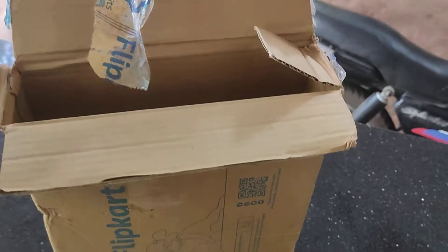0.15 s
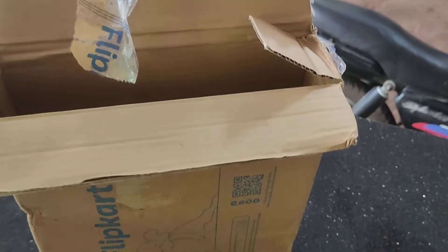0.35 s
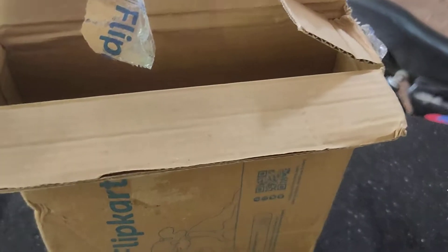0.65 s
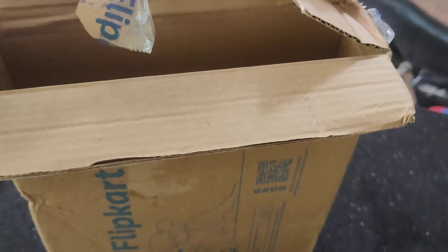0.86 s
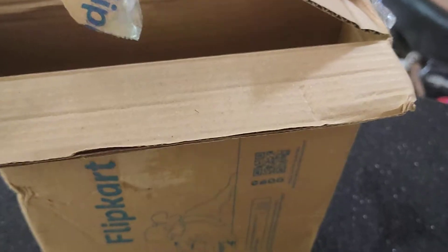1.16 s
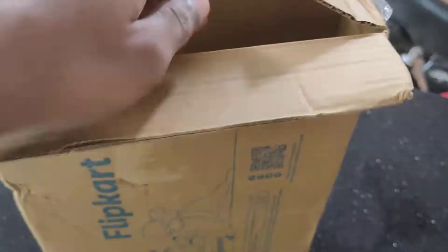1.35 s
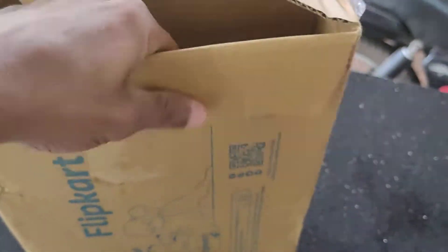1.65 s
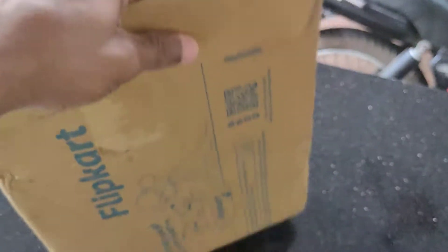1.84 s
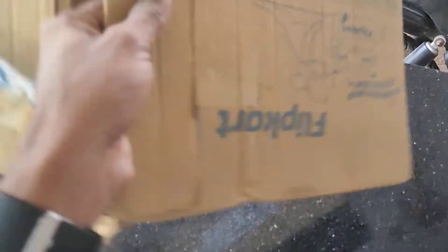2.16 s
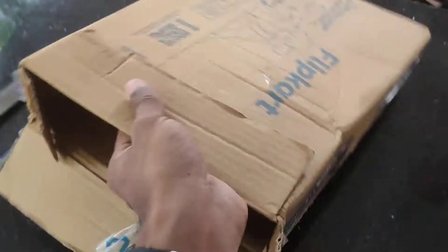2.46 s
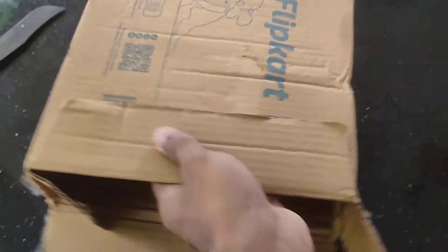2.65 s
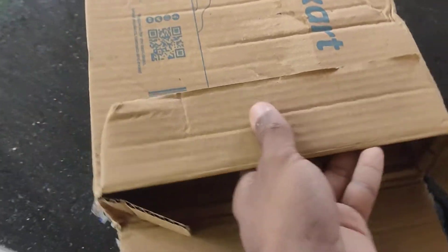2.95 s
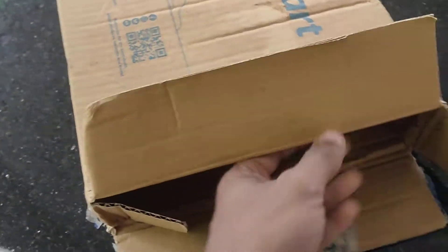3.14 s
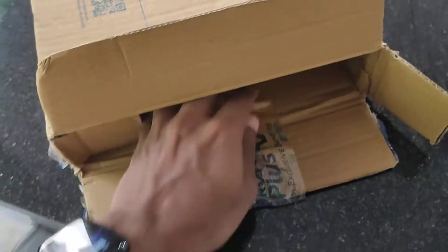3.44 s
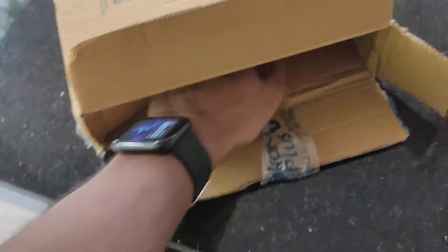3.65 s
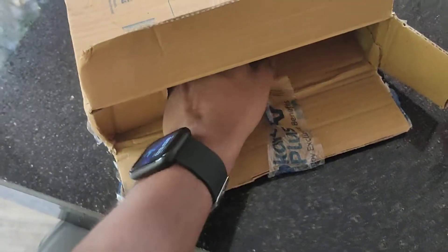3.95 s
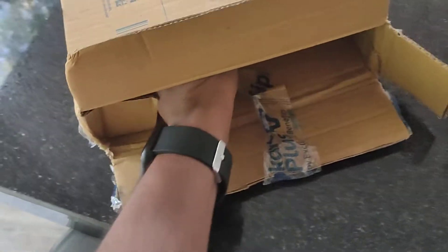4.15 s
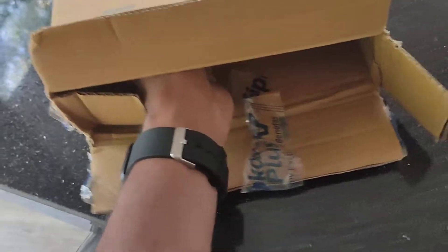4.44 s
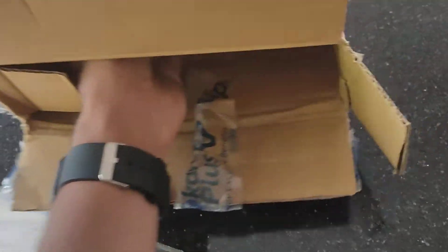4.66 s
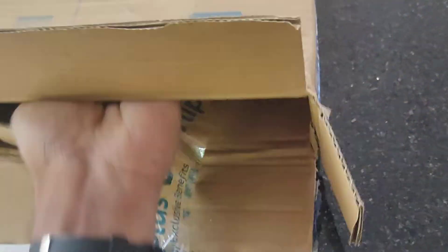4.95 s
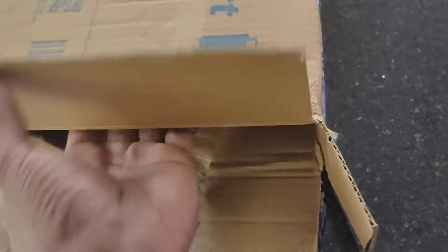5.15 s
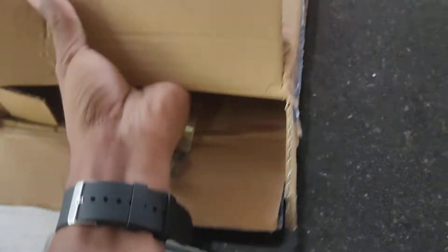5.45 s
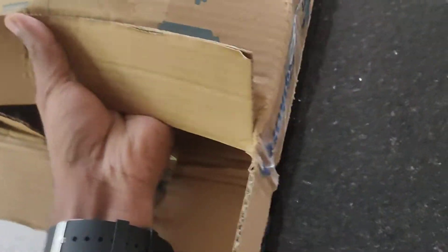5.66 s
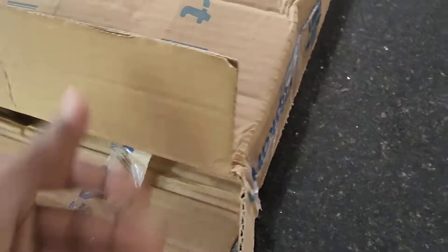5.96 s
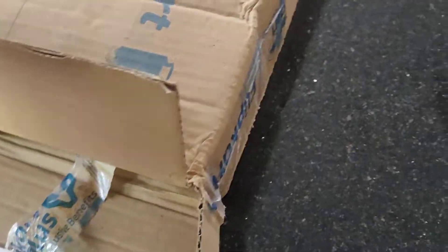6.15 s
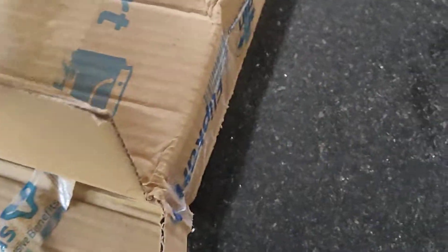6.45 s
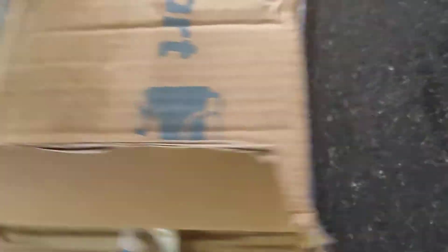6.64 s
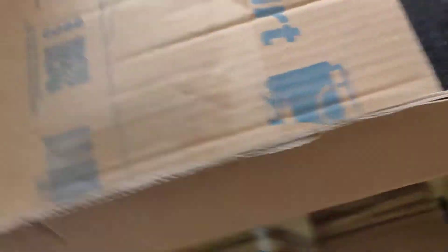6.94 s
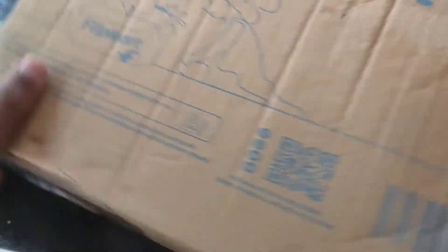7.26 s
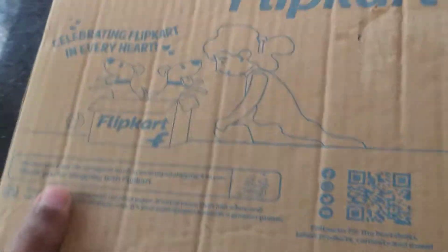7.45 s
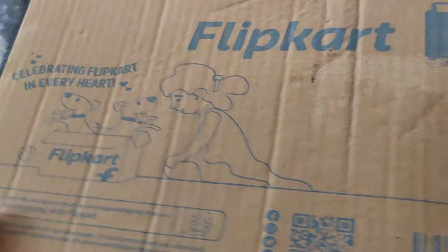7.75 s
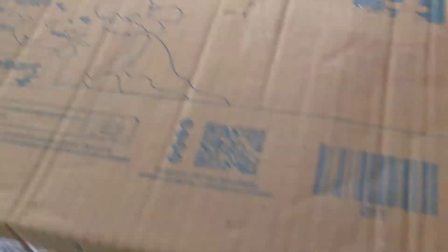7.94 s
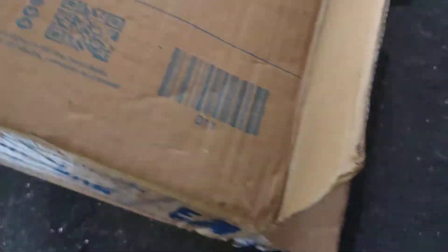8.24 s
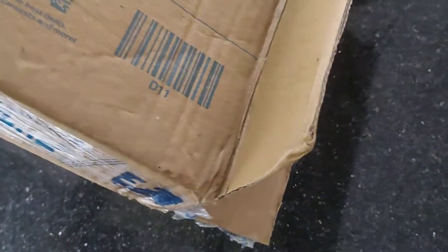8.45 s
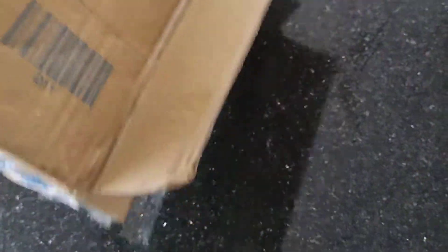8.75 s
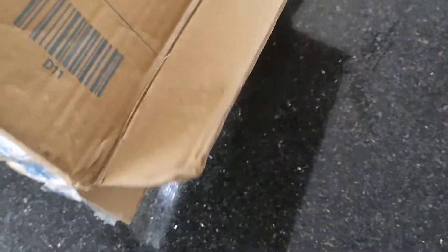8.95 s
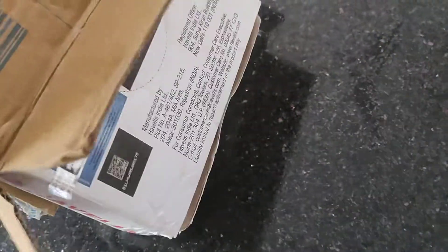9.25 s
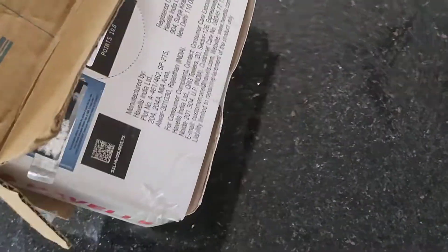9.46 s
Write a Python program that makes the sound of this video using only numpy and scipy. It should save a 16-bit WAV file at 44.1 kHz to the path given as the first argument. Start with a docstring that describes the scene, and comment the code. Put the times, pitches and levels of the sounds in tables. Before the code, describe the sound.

A quiet, small hard room with soft air noise and low handling rumble; the microphone is close. Faint cardboard brushing and a tiny far whistle come at 0.3 s. At 0.83-0.95 a knife clatters on stone in quick bright ticks with a short ring. From 1.4 hands grab the box with light rustles and creases; at 2.45-2.9 it is turned with two hollow thumps and sharp cracks. From 3.2 to 5.6 hands search inside: hissy rubs, tape crinkles, small snaps and dull knocks. At 5.85 the box lands on a corner, the loudest knock and crunch. A lull follows, with a very faint distant crow. From 6.5 to 8.5 it slides and turns, with a bright snap at 7.84. A clearer but distant rooster crows from 7.7 to 9.6. Near 8.9-9.25 a knock, strong scraping pull and loud snap finish, then small rustles.

```python
"""Cardboard rubs and slides: an open box is turned, searched and emptied on a stone counter.
Clicks and hiss passed through filters make the rubbing; short noise bursts make the snaps and knocks.
A knife put down with a clink is filtered noise plus the fading tones of its blade.
Far outside, sums of gliding tones crow like a rooster, and thin high tones whistle.
A small hard room answers with fading noise echoes, over a steady hum of air and a deep rumble."""
import sys
import numpy as np
from scipy import signal
from scipy.fft import rfft, irfft
from scipy.io import wavfile
from scipy.ndimage import uniform_filter1d

SR = 44100
rng = np.random.default_rng(int(sys.argv[2]) if len(sys.argv) > 2 else 0)


def to_wav(s):
    """Save 16-bit WAV."""
    ch = np.atleast_2d(s).T  # columns
    pcm = np.round(np.clip(ch, -1, 1) * 32767)  # PCM
    wavfile.write(sys.argv[1], SR, pcm.astype(np.int16))


N = 423360  # length in samples
TIME, HZ = np.arange(N) / SR, np.fft.rfftfreq(N, 1 / SR)

# Levels in the tables are starting points; the functions trim some of them.
# Loudest creases and tape snaps: (time [s], level [dB])
SNAP_EVENTS = [(1.484, -45), (1.6214, -45), (1.8402, -38.5), (2.2822, -47.5), (2.3136, -42.5), (2.467, -37),
               (2.499, -30), (2.5056, -34.5), (2.6503, -38.5), (2.6947, -38), (2.7292, -28), (2.832, -39),
               (2.877, -36), (3.272, -32.5), (3.294, -34.5), (3.3042, -29), (3.361, -27.5), (3.5193, -35),
               (3.5878, -31), (3.637, -41), (3.682, -34), (3.8063, -34), (3.8623, -39.5), (3.9541, -41.5),
               (4.041, -36), (4.1624, -43), (4.98, -28), (5.1669, -37.5), (5.3992, -30.5), (5.5429, -37),
               (5.6307, -41.5), (5.808, -41), (5.8542, -17), (6.912, -47), (7.511, -34), (7.8404, -24.5),
               (8.0591, -31.5), (8.0676, -37), (8.3961, -37), (8.8928, -34), (9.1705, -28), (9.1841, -19),
               (9.3258, -35.5), (9.5114, -37.5)]
# Blows on the box walls: (time [s], level [dB], deep tone [dB], hard tone [dB])
KNOCK_EVENTS = [(0.292, -42.5, 0, -14), (1.382, -52, -10, -7), (1.734, -42.5, -25, -19),
                (2.277, -48, -25, -19), (2.467, -25, -6.5, -15.5), (2.497, -22.5, -8, -14.5),
                (2.649, -36.5, -14, -19.5), (2.777, -39, -14.5, -10.5), (2.874, -41.5, -14, -4),
                (3.563, -40, -11, -12), (3.679, -39.5, -1, -3.5), (4.159, -40, -21, -21.5),
                (5.12, -38, -8.5, -14.5), (5.339, -38.5, 9.5, 1.5), (5.395, -36.5, -12, -7),
                (5.608, -39, -9, -21), (5.833, -34, -10, -17), (5.853, -16, -13.5, -12),
                (6.459, -42, -11.5, -20), (6.657, -36, -27.5, -35), (6.719, -38, -26, -28),
                (7.504, -40.5, -36, -18), (7.836, -38, -3, -42), (8.886, -26.5, -48, -32.5),
                (9.187, -27, -31, -20.5), (9.249, -31.5, -15, -7), (9.487, -42, 0, -3.5)]
# Bounces of the knife on stone: (time [s], level [dB])
KNIFE_BOUNCES = [(0.8341, -23), (0.8479, -17.5), (.857, -18.5), (0.859, -23.5), (.872, -30), (0.932, -26.5),
                 (.953, -24.5)]
# Ringing tones of the blade: (frequency [Hz], level [dB], time to fall 60 dB [s])
BLADE_TONES = [(2566, -3.5, 0.087), (3360, -8, 0.073), (4710, 0, .12), (5960, 2, 0.22), (6650, -5, 0.09),
               (7350, 10, .14)]
# Ringing tones of the box panels and the air inside: (frequency [Hz], level [dB], time to fall 60 dB [s])
BOX_TONES = [(183, -10.5, 0.11), (237, -8.5, 0.063), (295.7, -1.5, 0.1), (354.5, -0.5, 0.11),
             (482, -6, 0.17), (597, -3.5, 0.054), (730, 9.5, 0.03), (820, 1.5, 0.045), (1145, -2, 0.043),
             (1765, -2.5, 0.041)]
# Far crowing, one curve for each call: (time [s], pitch [Hz], level [dB])
CROW_CALLS = [
    [(5.5, 603, -86), (5.68, 618, -77), (5.76, 655, -74), (6.0, 672, -79), (6.2, 674, -95)],
    [(7.66, 750, -80), (7.84, 741, -78), (7.95, 726, -68), (8.02, 708, -72.5), (8.17, 776, -70.5),
     (8.3, 814, -67.5), (8.42, 832, -74), (8.56, 778, -69.5)],
    [(8.64, 778, -67.5), (9.05, 773, -65), (9.4, 758, -72), (9.6, 733, -79)],
]
# How strongly the crow's throat passes each pitch: (frequency [Hz], level [dB])
THROAT = [(600, -20), (720, 1.5), (775, -6), (820, 0.5), (1250, -3), (1440, -7.5), (1560, -6.5), (1650, -6),
          (2150, -9), (2450, -20)]
# Thin whistles: (time [s], length [s], start pitch [Hz], end pitch [Hz], level [dB])
WHISTLE_EVENTS = [(.26, .16, 7850, 7200, -59), (1.16, .2, 7700, 7300, -71), (6.28, .17, 7850, 7600, -68),
                  (8.22, .2, 7600, 7400, -66), (6.21, .16, 3640, 3610, -80)]
# Single scuffs, each in one broad resonance: (time [s], length [s], frequency [Hz], width [Hz], level [dB])
SCUFF_EVENTS = [(0.274, 0.069, 168, 50, -59.5), (0.223, 0.13, 6300, 1570, -62),
                (2.933, 0.39, 2300, 700, -67.5), (4.135, 0.31, 1200, 700, -64), (4.15, .1, 262, 60, -56),
                (5.301, 0.073, 350, 400, -56.5), (4.422, 0.73, 217, 50, -64),
                (5.845, 0.023, 1070, 191, -36), (6.535, 0.34, 400, 250, -56.5),
                (6.547, 0.33, 846, 345, -57.5), (9.06, 0.21, 173, 91, -50)]
# Strokes of cardboard over cardboard, skin and stone:
# (time [s], length [s], fastest point [0-1], hiss level [dB], panel drumming level [dB])
STROKE_EVENTS = [(0.0, 0.67, 0.55, -69.5, -75.5), (1.098, 0.29, 0.42, -68, -72),
                 (1.376, 0.042, 0.34, -52, -55), (1.447, 0.13, 0.12, -51, -58.5),
                 (1.61, 0.34, 0, -60.5, -68.5), (2.13, 0.031, 0.6, -60, -69),
                 (2.424, 0.17, .45, -52, -53.5), (2.632, 0.28, 0.32, -48.5, -60.5),
                 (2.914, .28, 0.71, -52.5, -72.5), (3.24, 0.15, 0.56, -43.5, -61.5),
                 (3.503, 0.35, 0.37, -50, -57), (3.935, 0.52, 0, -54.5, -64),
                 (4.149, .46, 0.49, -51, -57.5), (4.671, 0.16, 0.1, -53.5, -61.5),
                 (4.904, 0.27, 0.38, -47.5, -58), (5.202, 0.33, 0.6, -54, -59.5),
                 (5.607, 0.083, 0, -57, -68), (5.75, 0.28, 0.99, -48.5, -62), (6.47, 0.093, .8, -59.5, -64),
                 (6.556, 0.26, 0.24, -50.5, -62), (6.938, 0.51, .4, -50, -62.5),
                 (7.291, 0.39, 0.75, -50, -60.5), (7.714, 0.064, 0.2, -48.5, -59.5),
                 (7.83, 0.38, 0.36, -56.5, -62.5), (8.21, 0.28, .5, -60, -63.5),
                 (8.725, 0.29, 0.67, -47.5, -57.5), (8.99, .3, 0.49, -36, -45.5),
                 (9.312, 0.12, 0, -56.5, -60.5)]
# Handling sound that stays once the box is held: (time [s], hiss level [dB], panel drumming level [dB])
HOLDING = (1.38, -67.5, -71)
# Deep handling rumble over time: (time [s], level [dB])
RUMBLE_CURVE = [(0, -76.5), (1.1, -68.5), (2.6, -66.5), (3.1, -76), (3.7, -66), (4.7, -70), (5.7, -67),
                (6.3, -69.5), (8.4, -75.5), (9.2, -63), (9.6, -68)]
# Tone colours of hiss, drumming, snaps, thuds, steel and room air: (frequency [Hz], level [dB])
HISS_COLOUR = [(600, -53), (1600, -22.5), (2400, -5.5), (3100, -6.5), (4000, 0), (5200, 3.5), (6300, 8.5),
               (7600, 3.5), (9000, -52)]
DRUM_COLOUR = [(30, -2), (65, -2), (110, -2), (230, 3), (340, -2), (540, -5), (760, -3.5), (1100, -6.5),
               (1500, -9.5), (2200, -11), (4500, -39.5)]
SNAP_COLOUR = [(100, -28.5), (600, -22), (1500, -12.5), (2600, -14.5), (4000, -4), (5800, 8), (7200, 4),
               (8500, -15.5)]
THUD_COLOUR = [(30, 1), (100, -8.5), (220, 1), (330, 4.5), (520, -2), (750, -6), (1100, -3), (1500, -14),
               (1800, -10.5), (3000, -12), (8000, -19.5)]
STEEL_COLOUR = [(200, -32), (900, -24), (1900, -23.5), (2600, -13), (3600, -15.5), (5000, -8.5),
                (6800, 4.5), (8500, -14.5)]
AIR_COLOUR = [(20, 3.5), (35, -4.5), (60, -13), (130, -9), (300, -17), (1000, -27), (2500, -25),
              (4500, -29.5), (7000, -24), (9000, -32.5)]
# Tone colour of the rumble: (frequency [Hz], level [dB])
RUMBLE_COLOUR = [(15, -8.0), (28, -2), (55, -10.5), (90, -8.0), (200, -36.0), (1000, -80.0)]
# Left level against right level for the box: (frequency [Hz], difference [dB])
LEFT_OVER_RIGHT = [(100, 0), (800, 0.9), (1800, 1.8), (2700, 3.34), (3900, 7.98), (5600, 12), (6800, 7),
                   (7700, -3)]
# How alike the box sounds left and right: (frequency [Hz], likeness [0-1])
LIKENESS = [(100, 0.92), (300, 0.99), (700, 0.83), (2000, 0.18), (7000, 0.12)]
# How much of the room air is shared by left and right: (frequency [Hz], share of power [0-1])
AIR_SHARE = [(150, 0.88), (600, 0.65), (2000, .1)]
# How long the room's echoes last: (frequency [Hz], time to fall 60 dB [s])
ROOM_FADE = [(150, 0.31), (500, 0.43), (1500, 0.36), (4000, 0.47), (7000, 0.36)]

AIR_DB = -68.5
EDGE_HZ = 7980  # upper limit of the finished sound
# Each stroke starts and ends quieter than its fastest point, and catches and lets go quickly
START_DB, END_DB, GRAB_S, LET_GO_S = -8, -7, 0.0087, 0.017
# Loose tape: crinkles per second before clumping, strength of clumping, level against the fibres
CRINKLES_PER_S, CLUMP_DB, CRINKLE_DB = 45, 6, -6


def amp(db):
    """Turns decibels into a gain."""
    return 10 ** (np.asarray(db) / 20)


def unit(x):
    """Scales a sound to an average (rms) strength of 1."""
    return x / np.sqrt(np.mean(x ** 2) + 1e-20)


def strength(x, size=88):
    """Finds the rms of the loudest two milliseconds."""
    return np.sqrt(uniform_filter1d(x ** 2, size).max())


def read(points, hz):
    """Reads between the points of a table, with frequency on a log scale."""
    f, value = np.transpose(points)
    return np.interp(np.log(hz + 1), np.log(f + 1), value)


def add(mix, s, sound):
    """Mixes a sound in at time s."""
    part = mix[..., max(round(s * SR), 0):][..., :sound.shape[-1]]
    part += sound[..., :part.shape[-1]]


def colour(x, points, size=4096):
    """Filters a sound to a tone colour, with nothing heard before its cause."""
    log_gain = np.log(amp(read(points, abs(np.fft.fftfreq(size, 1 / SR)))))
    minimum_phase = np.exp(np.conj(signal.hilbert(log_gain)))
    taps = np.fft.ifft(minimum_phase).real[:size // 2]
    return signal.oaconvolve(x, taps)[:len(x)]


def wander(cutoff_hz):
    """Makes a random curve of rms 1, with little change faster than the cutoff."""
    noise = rfft(rng.standard_normal(N))
    return unit(irfft(noise / (1 + (HZ / cutoff_hz) ** 4), N))


def grains(per_s, spread_db, smooth):
    """Fibres catch and let go: clicks of uneven size over a smooth hiss."""
    size = amp(spread_db * np.minimum(rng.exponential(1, N), 4))
    clicks = (rng.random(N) < per_s / SR) * rng.choice([-1, 1], N) * size
    return unit(unit(clicks) + smooth * rng.standard_normal(N))


def burst(t, fall_s, after_db, after_s):
    """A sudden fracture, with a weaker spray of smaller ones that fades more slowly."""
    crack, spray = rng.standard_normal((2, len(t)))
    # cubing makes the spray spiky
    return crack * np.exp(-t / fall_s) + amp(after_db) * unit(spray ** 3) * np.exp(-t / after_s)


def ringing(t, tones, detune=(1, 1)):
    """Adds up tones that each fade at their own speed, as struck panels and blades do."""
    total = 0
    for hz, level, t60 in tones:
        turns = hz * rng.uniform(*detune) * t + rng.random()
        total = total + amp(level - 60 * t / t60) * np.sin(2 * np.pi * turns)
    return total


def air():
    """Steady room noise: partly shared by both microphones, partly separate."""
    shared, left, right = (rfft(unit(colour(rng.standard_normal(N), AIR_COLOUR))) for _ in range(3))
    share = np.clip(read(AIR_SHARE, HZ), 0, 1)
    both = np.sqrt(share) * shared + np.sqrt(1 - share) * np.array([left, right])
    return amp(AIR_DB) * irfft(both, N)


def rumble():
    """Hands and moving air shake the microphones, mostly below the box's own tones."""
    deep = colour(rng.standard_normal(N), RUMBLE_COLOUR)
    return amp(np.interp(TIME, *np.transpose(RUMBLE_CURVE))) * unit(deep)


def room(x):
    """Dense reflections off hard walls, each frequency band dying at its own speed."""
    t = np.arange(SR) / SR
    reflections = rng.standard_normal((2, SR)) * (rng.random((2, SR)) < .1)
    reflections = reflections * np.clip((t - .003) / 0.0075, 0, 1)  # they build up after 3 ms
    hz, at, bands = signal.stft(reflections, SR, nperseg=256)
    t60 = read(ROOM_FADE, hz)
    tail = signal.istft(bands * amp(-60 * at / t60[:, None]), SR, nperseg=256)[1]
    return signal.fftconvolve(x[None], tail / np.linalg.norm(tail[0]), axes=1)[:, :N]


def whistles():
    """Thin tones that swell, glide and fade, with a quick flutter in pitch."""
    out = np.zeros(N)
    flutter = wander(cutoff_hz=510)
    for s, length, start_hz, end_hz, db in WHISTLE_EVENTS:
        t = np.arange(0, length, 1 / SR)
        hz = np.linspace(start_hz, end_hz, len(t)) * (1 + 0.013 * flutter[:len(t)])
        tone = np.sin(2 * np.pi * np.cumsum(hz) / SR)
        add(out, s, amp(db - 1.0) * np.sin(np.pi * t / length) * tone)
    return out


def crowing():
    """Hoarse, unsteady calls: three harmonics sweep through the resonances of a throat."""
    out = np.zeros(N)
    for call in CROW_CALLS:
        s, hz, db = np.transpose(call)
        pitch = np.interp(TIME, s, hz)
        turns = np.cumsum(pitch * (1 + 0.0082 * wander(cutoff_hz=67.2))) / SR
        cry = sum(amp(read(THROAT, k * pitch)) * np.sin(2 * np.pi * k * turns) for k in range(1, 4))
        level = amp(np.interp(TIME, s, db)) * (TIME > s[0]) * (TIME < s[-1])
        out += cry * uniform_filter1d(level, size=1500)  # soften the start and end
    return out


def knife():
    """The knife bounces on the stone, chatters after each bounce, and its thin blade rings on."""
    t, out = np.arange(SR // 2) / SR, np.zeros((2, N))
    for s, db in KNIFE_BOUNCES:
        chatter = (rng.random(len(t)) < 260 / SR) * rng.exponential(1, len(t)) * np.exp(-t / 0.032)
        for side in out:
            tick = colour(burst(t, fall_s=0.0015, after_db=-14.5, after_s=0.029), STEEL_COLOUR)
            tick = tick / strength(tick)
            rattle = signal.fftconvolve(chatter, tick)[:len(t)]
            ring = ringing(t, BLADE_TONES)
            add(side, s, amp(db - 4) * (tick + amp(-21.0) * rattle + amp(-21.5) * ring))
    return out * amp([[1.6], [-1.6]])  # a little louder on the left


def knocks():
    """A blow crushes the wall with a dull thud and rings the box; its deep and hard tones vary."""
    t, paths = np.arange(SR // 4) / SR, np.zeros((2, N))
    for s, db, deep_db, hard_db in KNOCK_EVENTS:
        tone = [(260, deep_db + 13.5), (650, 0.002), (1250, hard_db + 15.0)]
        for path in paths:
            ring = ringing(t, BOX_TONES, detune=(0.97, 1.015))
            thud = colour(burst(t, fall_s=0.0085, after_db=-15, after_s=0.035), THUD_COLOUR)
            blow = (unit(thud) + amp(-4.5) * unit(ring)) * (1 - np.exp(-t / 0.00085))
            blow = colour(blow, tone)
            add(path, s, amp(db - 6.5) * blow / strength(blow))
    return paths


def crunch():
    """The box lands on its corner, and the cardboard's flutes collapse within a few milliseconds."""
    t, paths = np.arange(SR // 8) / SR, np.zeros((2, N))
    for path in paths:
        crush = colour(burst(t, fall_s=0.0016, after_db=-23, after_s=0.01), SNAP_COLOUR)
        add(path, 5.858, amp(-19.0) * crush / strength(crush))
    return paths


def snaps():
    """Creases and tape give way in short bright cracks; a few fibres tear just ahead of each."""
    t, paths = np.arange(SR // 8) / SR, np.zeros((2, N))
    for s, db in SNAP_EVENTS:
        for path in paths:
            crack = colour(burst(t, fall_s=0.0012, after_db=-16.0, after_s=0.0067), SNAP_COLOUR)
            add(path, s + .0008, amp(db + 0.5) * crack / strength(crack))
            fading = rng.standard_normal(len(t)) ** 3 * np.exp(-t / 0.0084)
            tearing = colour(fading[::-1], SNAP_COLOUR)  # reversed, so it grows toward the crack
            add(path, s + 0.00084 - t[-1], amp(db - 17.5) * tearing / strength(tearing))
    return paths


def scuffs():
    """Skin and board drag over a panel: stick-slip grains swell and fade in one resonance."""
    paths = np.zeros((2, N))
    for path in paths:
        fibres = rfft(grains(per_s=1800, spread_db=8.5, smooth=0.64))
        for s, length, hz, width_hz, db in SCUFF_EVENTS:
            resonance = unit(irfft(fibres / (1 + 1j * (HZ - hz) / width_hz) ** 3, N))
            swell = signal.windows.tukey(round(length * SR), .7)
            add(path, s, amp(db) * swell * resonance[round(s * SR):][:len(swell)])
    return paths


def effort():
    """Gains of hiss and drumming: each stroke catches, swells to its fastest point, slows and lets go."""
    held_s, *held_db = HOLDING
    power = np.outer(amp(held_db) ** 2, TIME > held_s)
    for s, length, fastest, hiss_db, drum_db in STROKE_EVENTS:
        t = TIME[:round((length + .2) * SR)]
        swell = amp(np.interp(t / length, [0, np.clip(fastest, .02, .98), 1], [START_DB, 0, END_DB]))
        stroke = swell * np.minimum(t / GRAB_S, 1) * np.exp(-np.maximum(t - length, 0) / LET_GO_S)
        add(power, s, np.outer(amp([hiss_db, drum_db]), stroke) ** 2)
    return np.sqrt(power)


def rubbing():
    """Cardboard slides in uneven slips: fibres hiss, tape crinkles in clumps, and the panels drum along."""
    hiss, drum = effort()
    slips = wander(cutoff_hz=65)
    crinkle_rate = CRINKLES_PER_S * amp(CLUMP_DB * wander(cutoff_hz=12))
    crinkles = (rng.random(N) < crinkle_rate / SR) * np.minimum(rng.exponential(1, N), 3)
    paths = np.zeros((2, N))  # two ways to the microphones
    for path in paths:
        fibres = grains(per_s=1800, spread_db=3.5, smooth=1.0)
        crinkle = rng.standard_normal(130) * np.exp(-np.arange(130) / 30)  # about 3 ms of noise
        crinkling = signal.oaconvolve(crinkles, crinkle)[:N]
        rustle = colour(unit(fibres) + amp(CRINKLE_DB) * unit(crinkling), HISS_COLOUR)
        path += hiss * amp(1.5 * slips) * unit(rustle)
        path += drum * amp(-1.5 + 2.2 * slips) * unit(colour(fibres, DRUM_COLOUR))
    return paths


def ports(common, other, count=5):
    """Two microphones: the left hears the box a few samples later, the right is mostly duller."""
    alike = np.clip(read(LIKENESS, HZ), 0, 1)
    left = rfft(common)
    right = alike * left + np.sqrt(1 - alike ** 2) * rfft(other)
    ratio = amp(read(LEFT_OVER_RIGHT, HZ))
    shade = np.sqrt(2 / (1 + ratio ** 2))  # keeps the combined power of both sides
    return np.array([np.roll(irfft(left * ratio * shade, N), count), irfft(right * shade, N)])


def scene():
    """Mixes the close box, the knife, the outdoors heard mostly through the room, and the background."""
    rub = rubbing() + scuffs()
    crack = snaps() + crunch()
    knock = knocks()
    clink = knife()
    far = crowing() + whistles()
    walls = room(amp(-10.0) * rub[0] + amp(-12.5) * crack[0] + amp(-9.5) * knock[0])
    box = ports(*(rub + crack + knock + walls))
    echoes = room(amp(-7.5) * clink[0] + amp(6.0) * far)
    return box + clink + far + echoes + air() + rumble()


def record(dry):
    """Cuts off everything above the upper limit with a steep filter."""
    low_pass = signal.firwin(301, EDGE_HZ, window=("kaiser", 8), fs=SR)
    return signal.oaconvolve(dry, low_pass[None], "same", axes=1)


dry = scene()
out = record(dry)
to_wav(out)
```